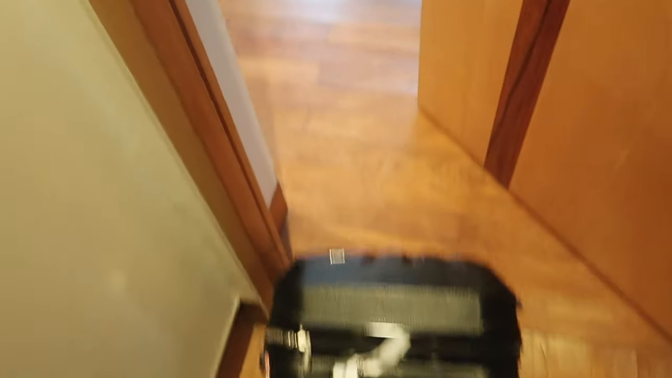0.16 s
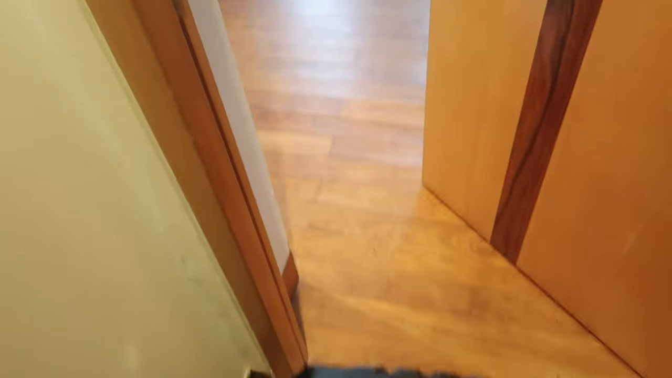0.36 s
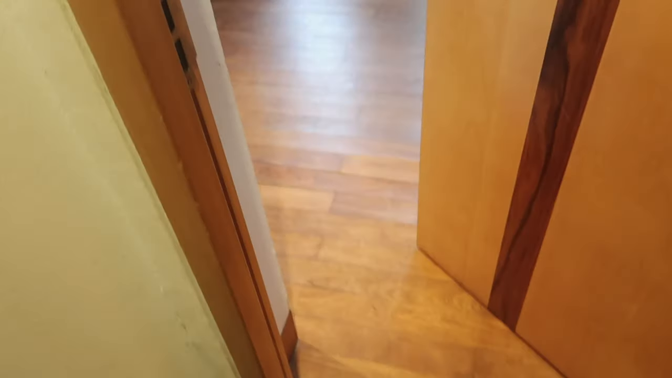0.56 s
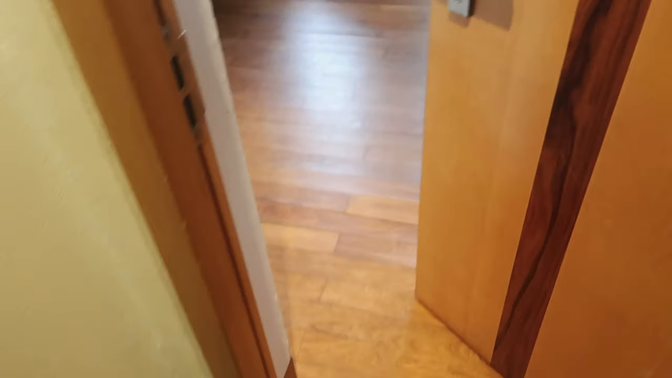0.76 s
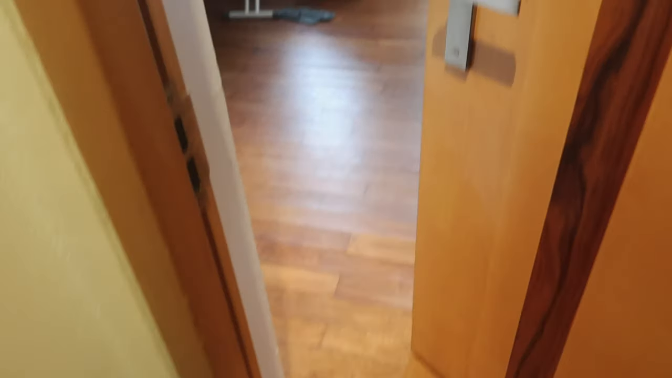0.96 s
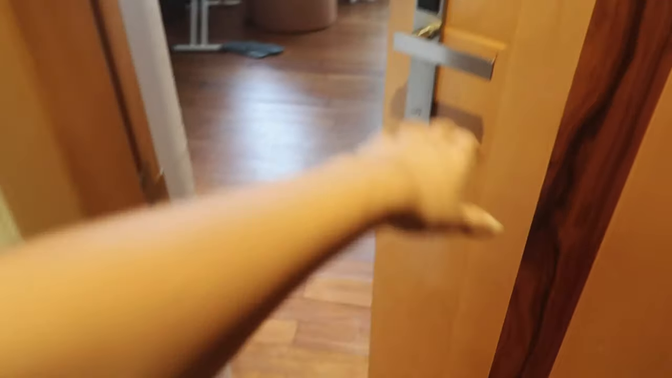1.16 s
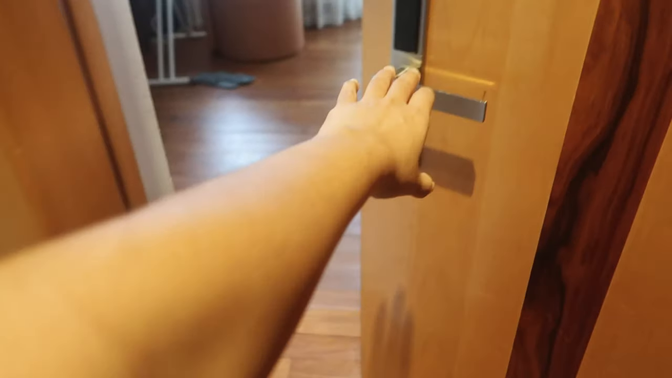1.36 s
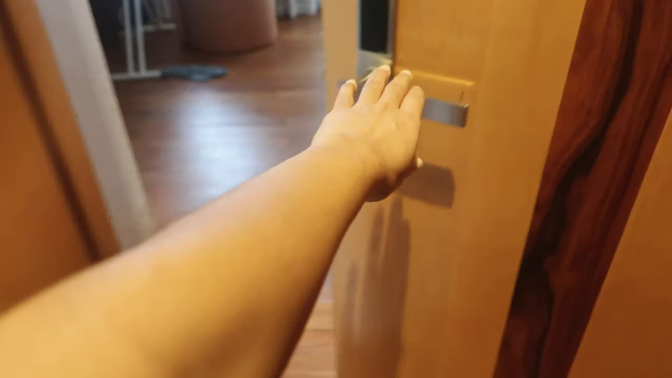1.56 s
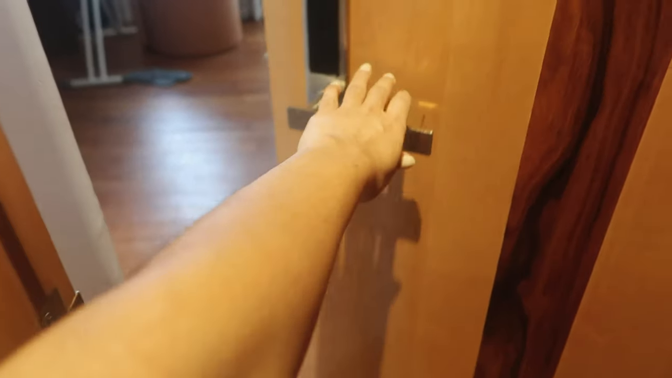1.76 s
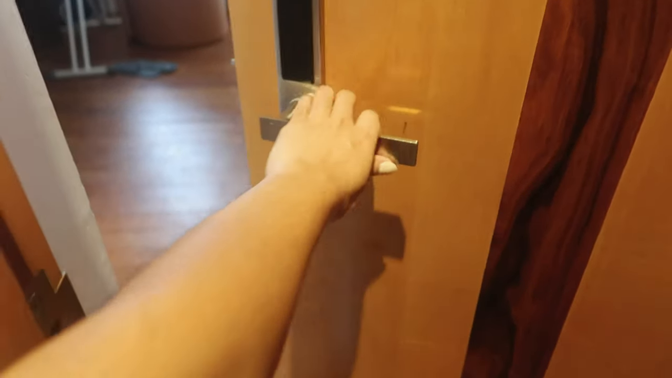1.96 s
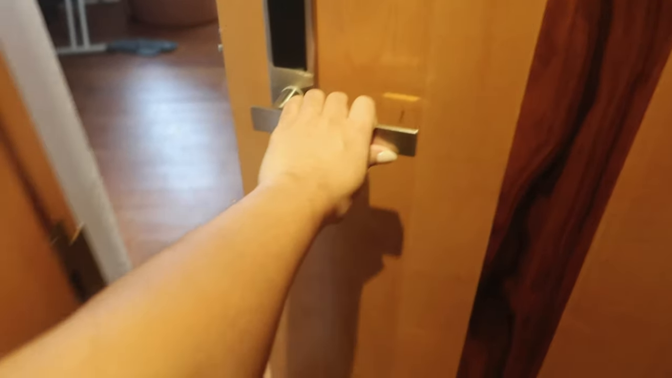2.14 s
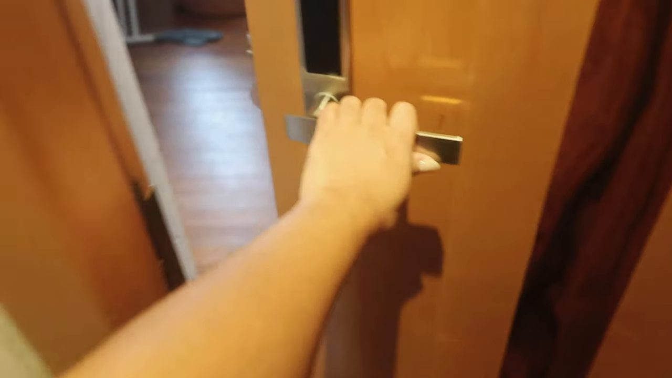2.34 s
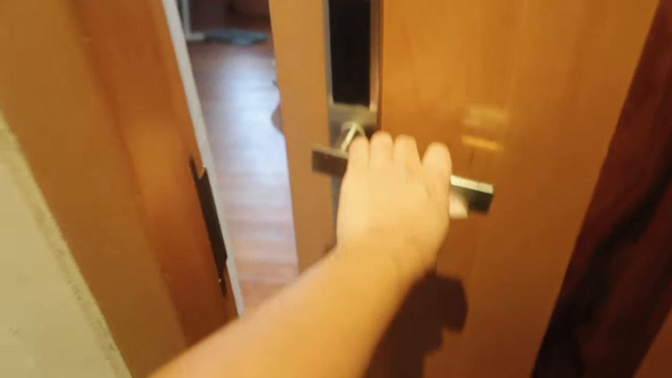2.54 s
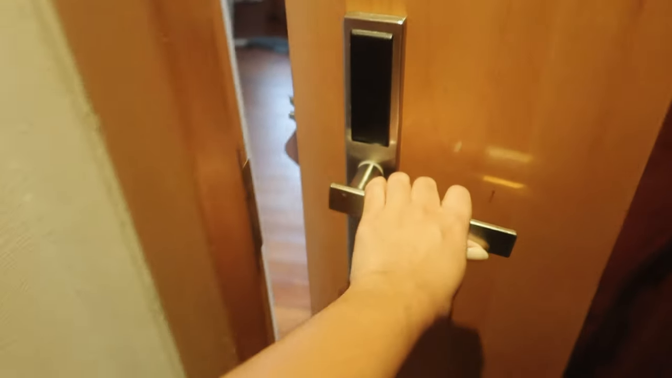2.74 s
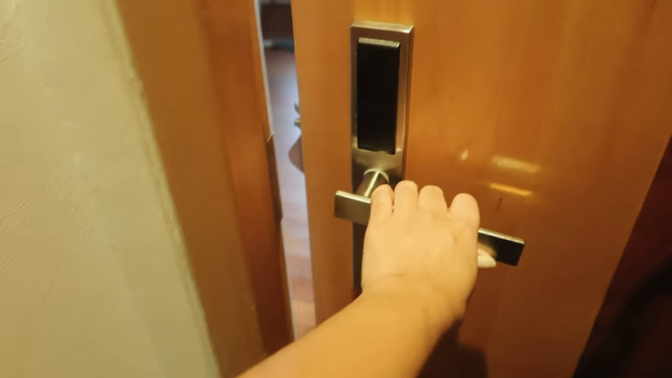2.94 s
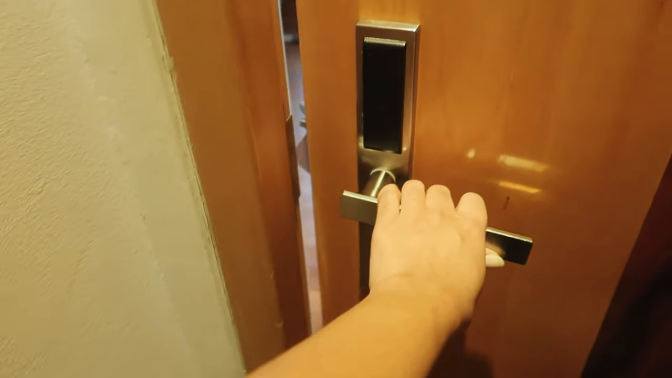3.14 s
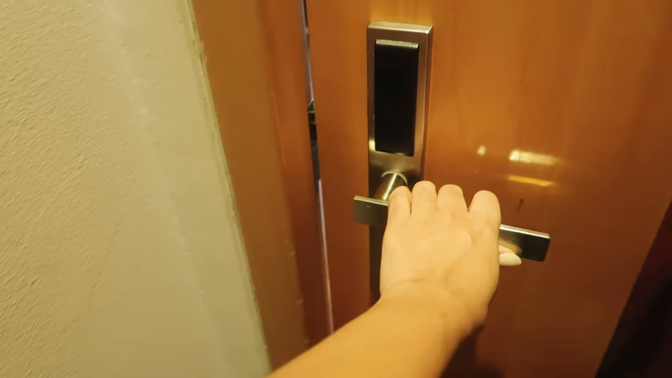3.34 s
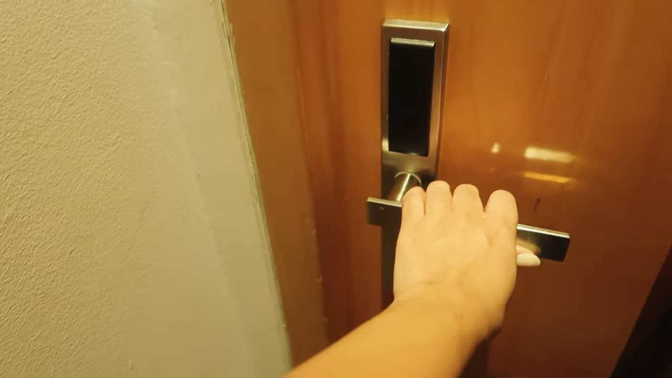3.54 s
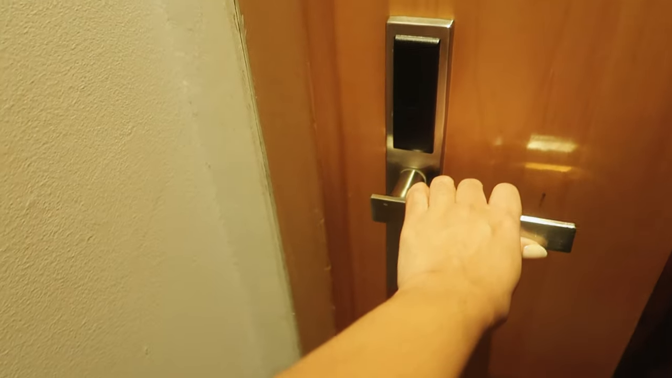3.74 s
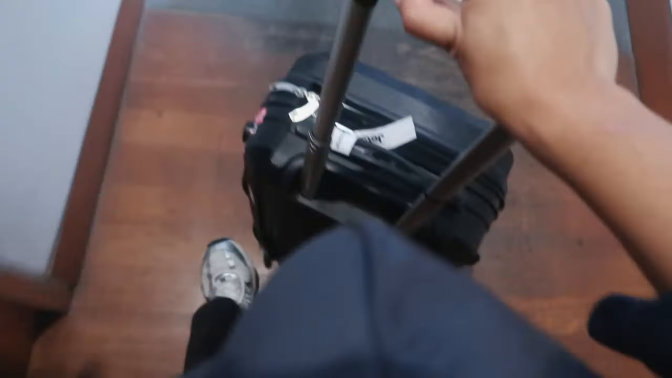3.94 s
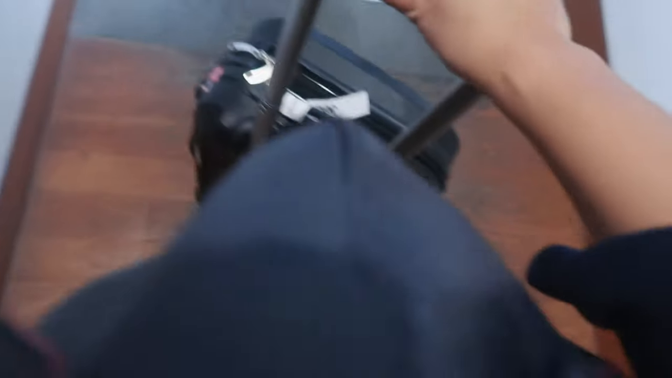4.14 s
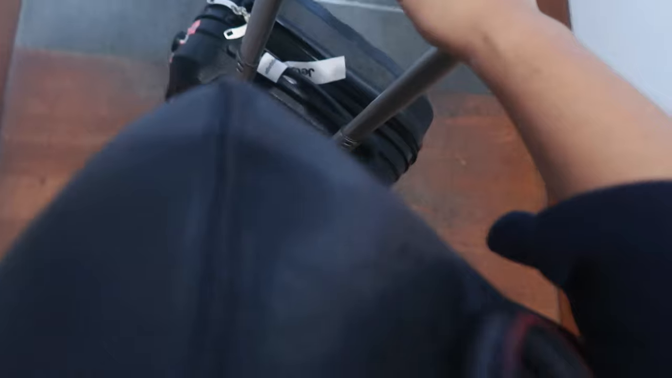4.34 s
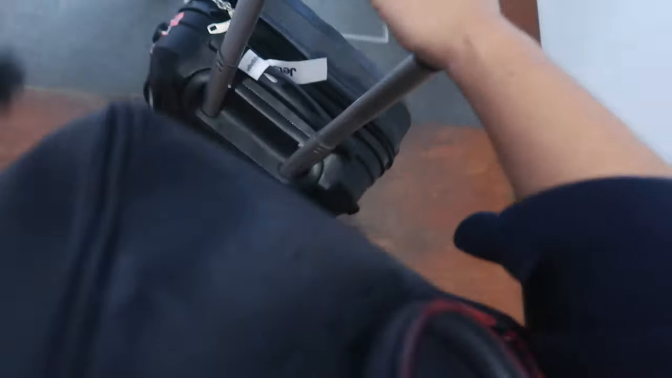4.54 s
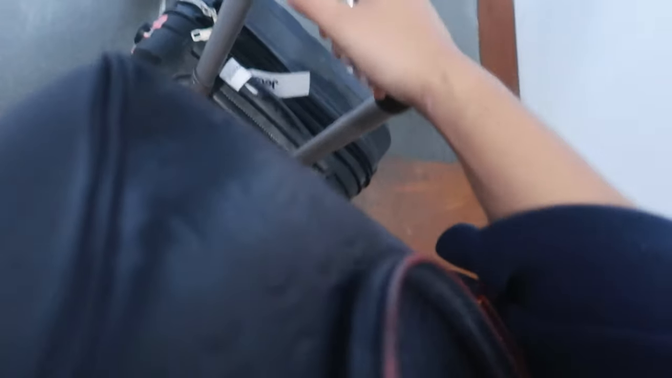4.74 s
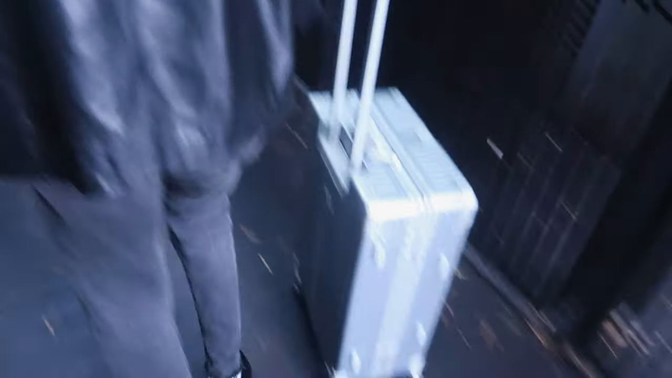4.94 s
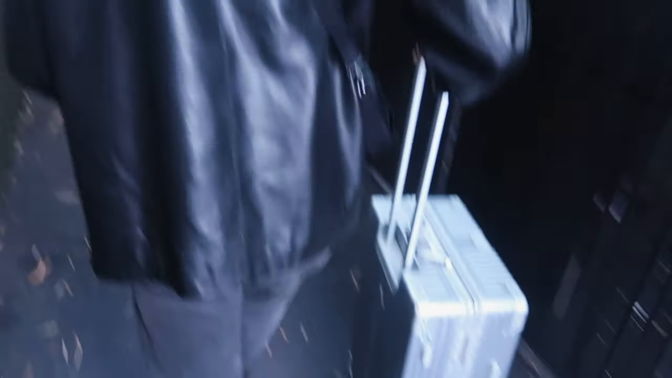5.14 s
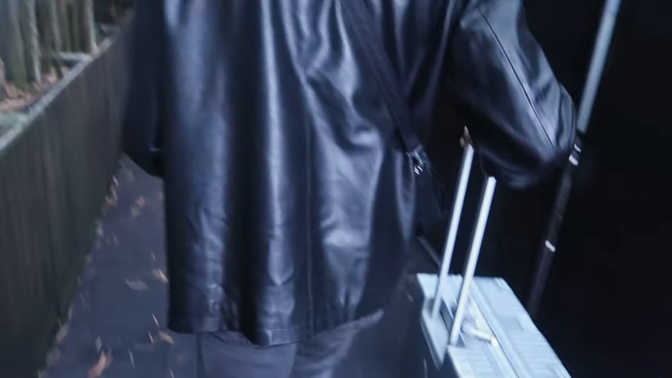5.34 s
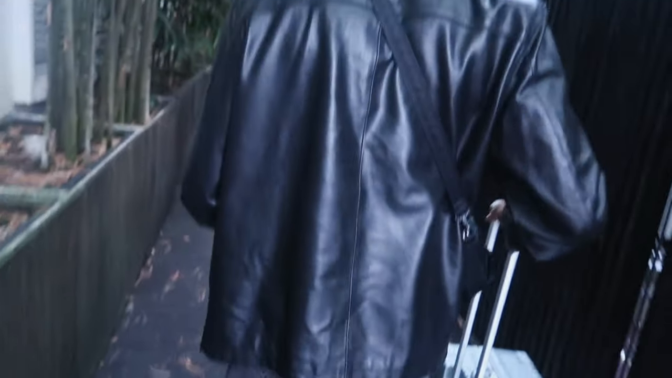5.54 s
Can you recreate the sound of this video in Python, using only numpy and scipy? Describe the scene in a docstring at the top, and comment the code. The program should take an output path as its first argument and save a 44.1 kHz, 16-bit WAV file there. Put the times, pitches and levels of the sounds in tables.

```python
"""A hard suitcase rolls over a wooden floor and a threshold: random wheel collisions drive a ringing shell.
A sleeve swishes, a lever clicks, and the door shuts: steel latch blows lead modal wood and loose fittings.
Dull bumps jolt the microphone; then a quiet hallway of filtered noise carries rustles and a few ticks.
Last, the suitcase rumbles outdoors along paving: dense collisions, small stones and seam knocks."""
import sys
import numpy as np
from scipy import signal
from scipy.fft import rfft, irfft, next_fast_len
from scipy.io import wavfile
from scipy.ndimage import uniform_filter1d, map_coordinates

SR = 44100
rng = np.random.default_rng(int(sys.argv[2]) if len(sys.argv) > 2 else 0)


def transcribe(u):
    """Save the signal u as a 16-bit wav file named by the first command-line argument.

    u: samples, shape (n,) or (channels, n), limited to [-1, 1]; the rate is SR.
    q: integer samples, one column per channel.
    """
    v = np.clip(np.atleast_2d(u).T, -1, 1)
    q = np.round(v * 32767).astype(np.int16)
    wavfile.write(sys.argv[1], SR, q)


N = 251050
TIME = np.arange(N) / SR
ROOM_END_S, LEAVE_S, OUTDOORS_S = 3.905, 3.96, 4.938
TOP_HZ = 15700

# Levels are relative, ahead of the later filters and echoes.
# Case rolling over boards: start_s, end_s, rumble_db
ROLLS = [(0, .27, -38), (.36, .83, -32.5), (1.25, 1.42, -40.5), (2.62, 2.7, -41), (3.01, 3.03, -30.5)]
ROLL_RISE_S, ROLL_COAST_S = 0.035, 0.1
GRIT_DB = -4.5  # specks re rumble
# Wheels juddering across the threshold: start_s, end_s, level_db
JUDDERS = [(.735, .785, -21.5), (2.555, 2.58, -30.5), (2.968, 3.005, -30.5)]
JUDDER_RISE_S, JUDDER_FALL_S = 0.0016, 0.029
CLATTER_DB = -11  # housings re judder, at its peak
# Wheel dropping over a joint or threshold rib: start_s, level_db, rattle_s, boom_db, brightness_db_per_octave
KNOCKS = [(.083, -16.5, 0.019, 4.5, -2.5), (.147, -19.5, 0.029, -5, -2.5), (0.238, -20, 0.0065, 4, -1.5),
          (.363, -23.5, 0.0034, -6, -1.5), (.374, -28.5, 0.005, -22, -2.5), (.386, -25.5, 0.0056, -6, -3.5),
          (0.415, -32, 0.0047, 14, 4.5), (.453, -24.5, .004, 8, -0.5), (0.486, -28.5, 0.0053, -13, .5),
          (.533, -24.5, 0.0059, -2, .5), (.568, -24, 0.0045, -3, -1), (.618, -30.5, 0.0031, -15, -2.5),
          (.664, -23.5, 0.0068, 3, -8), (0.729, -11.5, .004, -11, -1), (.738, -14.5, 0.0049, -14, -1),
          (.744, -14.5, 0.0047, -20, 0), (.754, -10.5, 0.0034, -3, -5), (.765, -11.5, .004, -4, -3),
          (.78, -15, 0.003, -21, -5), (.796, -21.5, 0.0042, -4, -4), (.95, -23, 0.003, -16, -1),
          (1.011, -18, .012, 3.5, -6), (1.029, -19.5, 0.0034, -7, -2), (1.178, -10.5, 0.012, -3, -3),
          (2.056, -32.5, 0.018, -7, -5), (2.545, -18, 0.021, -5.5, 0.5), (2.577, -25.5, 0.011, 1.5, -2),
          (2.726, -28.5, 0.0072, 5, 2), (2.761, -21.5, 0.0017, 0, -5.5), (2.894, -24, 0.0078, 0.5, -3.5),
          (2.964, -20, 0.018, -11, -3.5), (2.974, -17.5, 0.012, -5, -5), (2.997, -22, 0.0099, -1, -1),
          (3.146, -26, .0076, 3, -4.5)]
HOUSING_DB, HOUSING_DB_PER_DB = -13.5, 0.41  # housing re knock at -7.5 dB; extra per dB of knock
SHAKE_DELAY_S, SHAKE_DB, SHAKE_S = 0.037, -16, 0.014  # loose case shaking on after a knock
# Boards giving under the load: start_s, level_db
FLOOR_THUDS = [(0.241, -28), (.752, -20), (2.761, -33)]
# Plastic casters swivelling and clacking: start_s, level_db, rattle_s
CLACKS = [(0.87, -32, 0.019), (.951, -32, 0.026), (.967, -30.5, 0.016), (0.993, -35, 0.03)]
# Wheel or axle ringing on one note: start_s, pitch_hz, level_db
CHIRPS = [(.787, 2440, -29), (.827, 1790, -28.5), (.853, 1200, -32.5), (.881, 3186, -34.5),
          (.951, 675, -25.5), (.992, 3315, -35), (1.029, 653, -33), (2.761, 445, -25.5), (2.894, 485, -21)]
CHIRP_WIDTH_HZ = 56
# Shell of the case with the boards, broad spectrum: freq_hz, density_db
CASE_SPECTRUM = [(30, -28.5), (90, -25.5), (160, 1), (230, -1), (288, 2.5), (330, 2.5), (470, -2.5),
                 (590, -14.5), (668, -2.5), (1000, -15), (1490, -24), (2400, -34), (3300, -32),
                 (10000, -51), (14000, -81)]
# Ringing shell: freq_hz, width_hz, level_db
CASE_MODES = [(178.3, 11, -2.5), (228.5, 5.9, -8), (279.4, 3, -5), (376, 8.9, -11), (480, 11, -12.5),
              (637.3, 21, -10.5), (761, 19, -23.5), (1850, 40, -32.5), (2320, 43, -27), (2580, 37, -39.5)]
# Wheel housings and swivels: freq_hz, width_hz, level_db
WHEEL_MODES = [(625, 70, 1), (770, 78, 4.5), (1020, 90, 0.5), (1200, 100, 2.5), (1380, 220, -3.5),
               (1784, 280, -7.5), (2288, 89, -1), (2440, 88, -4.5), (2760, 130, -4), (3050, 140, -16)]
HOUSING_SHIFT = 0.037  # random pitch spread per blow, share
# Floorboards: freq_hz, width_hz, level_db
FLOOR_MODES = [(113, 26, 0)]
# Caster clack: freq_hz, density_db
CASTER_SPECTRUM = [(300, -13), (1000, -12), (1500, -6.5), (2600, -4.5), (5400, -7.5), (6400, -4),
                   (10500, -16.5), (12500, -30)]
# Casters: freq_hz, width_hz, level_db
CASTER_MODES = [(2500, 110, 10), (2720, 100, 4), (3000, 77, 6), (3365, 140, 3), (6040, 180, -5),
                (6700, 101, -11), (7400, 140, -3), (10500, 370, 1)]
# Overall tone of the suitcase sounds, deep bass and top rolled off: freq_hz, gain_db
SUITCASE_TONE = [(30, -11.5), (75, 0), (9500, -1.5), (11500, -3), (13000, -11.5)]

# Room decay: freq_hz, t60_s
ROOM_T60 = [(100, 0.65), (260, 0.8), (700, 0.3), (1840, 0.66), (5000, 0.31), (12000, 0.25)]
# Side channel gain over frequency: freq_hz, gain_db
SIDE_WIDTH = [(60, -30), (200, -24.5), (400, -13), (1290, -8), (2400, -3), (4400, 3.5), (8100, 7.5),
              (15000, 19)]
# Ventilation: freq_hz, density_db
ROOM_AIR = [(15, -31), (28, -10.5), (90, 6), (330, 4.5), (560, -6.5), (900, -13.5), (1600, -14.5),
            (3000, -28.5), (5300, -33), (11000, -41.5), (14500, -57)]

# Sleeve swishes: peak_s, level_db, fall_s
SWISHES = [(.42, -37.5, 1), (1.33, -47, 0.25), (1.758, -38.5, 0.12), (2.18, -32, 0.033),
           (2.49, -40.5, 0.85)]
SWISH_RISE_PER_FALL = 0.21
# Sleeve cloth: freq_hz, density_db
SLEEVE_SPECTRUM = [(150, 7), (600, 1.5), (1400, -5), (3300, -13.5), (5200, -19), (9000, -29.5),
                   (13000, -43.5)]

# Play in the door lever: start_s, level_db
LEVER_CLICKS = [(1.538, -32), (1.905, -28), (2.728, -35.5)]
# Door lever: freq_hz, width_hz, level_db
LEVER_MODES = [(383, 184, 3.5), (905, 74, 7.5), (1110, 160, -23), (1620, 370, -4), (2650, 770, -16.5),
               (5460, 130, -10.5)]
# Door meeting its frame, steel first:
# start_s, wood_db, steel_db, wood_brightness_db_per_octave, blow_s (base rattle), wood_lag_s, boom_db
SHUTS = [(3.403, -13.5, -9.5, 0.1, 0.0058, 0.0029, 0), (3.459, -23.5, -30, 0, 0.015, 0.0024, 4.5),
         (3.507, -14.5, -23, -1, 0.0089, 0.0052, 0), (3.595, -27.5, -36.5, 0.5, .008, 0.0029, -1),
         (3.623, -18, -55, -2.5, 0.011, 0.0015, 1.5), (3.641, -23.5, -51.5, -1.5, 0.014, 0.0015, 6.5),
         (3.6954, -5, -17, -1, .0035, 0.00047, -1), (3.719, -16, -29.5, -5, .006, 0.0011, 4.5),
         (3.73, -20, -34.5, -4.5, .004, 0.00088, 8.5), (3.751, -24.5, -28, -2.5, 0.0071, 0.0018, 7.5),
         (3.812, -12.5, -33, -2, 0.0033, .004, -1), (3.868, -21, -65, -4, 0.016, .003, 14.5)]
# First touch, strike and rebound of every blow: delay_s, level_db, rattle_factor
STRIKE = [(-.007, -24, .6), (0, -1, 1.1), (.022, -21.5, 2.5)]
# Leaf and frame: freq_hz, width_hz, level_db
DOOR_MODES = [(48, 23, -15.5), (102, 45, -9.5), (165, 4.7, 5.5), (218, 12, 2), (285, 6.7, 0),
              (365, 17, 9.5), (451, 11, 1), (663, 11, -0.5), (720, 80, -3), (765, 24, -1.5), (931, 27, 0),
              (1120, 70, -2.5), (1445, 57, -11), (1540, 89, -8.5), (1644, 44, -11.5), (1863, 50, -17),
              (2150, 150, -14.5), (2414, 170, -15), (2720, 150, -13.5), (3070, 260, -19), (4155, 400, -25),
              (5470, 310, -35.5)]
LATCH_SHIFT, DOOR_SHIFT = 0.034, 0.03  # random pitch spread per blow, share
# Dead knock of the frame: freq_hz, density_db
FRAME_SPECTRUM = [(40, -10.5), (160, -2.5), (400, -4), (700, -5.5), (1100, -17.5), (2000, -20.5),
                  (4500, -41.5), (12000, -53)]
# Tone of the door's wooden part, soft at the very top: freq_hz, gain_db
WOOD_TONE = [(4500, 0.5), (8000, -1.5), (13000, -14.5)]
# Loose lock case and hinges: freq_hz, density_db
FITTINGS_SPECTRUM = [(250, -18.5), (600, 4), (950, 2.5), (1500, -5), (2700, -12), (4200, -24.5),
                     (8000, -38.5), (14000, -70)]
FITTINGS_DB, FITTINGS_S, FITTINGS_PER_S = -8, 0.012, 380  # level re wood, decay, ticks per s
# Latch bolt clicking on its own: start_s, level_db, brightness_db_per_octave
LATCH_CLICKS = [(3.452, -32.5, 0), (3.498, -27, 1), (3.711, -23.5, -2), (3.722, -27, 3.5), (3.738, -30, 2),
                (3.883, -34.5, -1.2)]
# Crack of steel on steel: freq_hz, density_db
STEEL_SPECTRUM = [(300, -18.5), (1100, 4), (2600, -1), (3800, -2), (5100, -1), (6800, -11.5), (9000, -11.5),
                  (13500, -18), (15500, -27.5)]
# Latch: freq_hz, width_hz, level_db
LATCH_MODES = [(1049, 110, 2), (1130, 45, -4.5), (1390, 50, -2.5), (1700, 43, 3.5), (2140, 60, -0.5),
               (2480, 87, -1), (2900, 100, -11), (3170, 70, -3.5), (4650, 120, -14), (4800, 78, -2.5),
               (5750, 120, -4), (7100, 80, -8)]

# Dull bumps close to the microphone: start_s, level_db, brightness_db_per_octave, push_db
BUMPS = [(1.876, -29, -29, -30), (3.9504, 1, 1, -3), (5.1303, -4, -0.5, -38)]
# A brush and two quick jolts in every bump: delay_s, level_db, rattle_s
JOLTS = [(-.005, -10, 0.0074), (0, -6.5, 0.01), (.0065, -2.5, .002)]
# Jolt: freq_hz, density_db
THUD_SPECTRUM = [(20, -27.5), (60, -5.5), (135, -0.5), (280, 1.5), (480, -4.5), (680, -22.5), (1200, -41.5),
                 (2600, -39), (5000, -54), (13000, -77.5)]
# Deep push: freq_hz, density_db
PUSH_SPECTRUM = [(12, -11.5), (35, -3.5), (120, 2), (200, -9.5), (600, -50.5), (3000, -86)]
PUSH_DELAY_S = 0.0017
# Crack ending the hardest bump: start_s, level_db
BUMP_CRACK = (3.9578, -15)
# Crack: freq_hz, density_db
CRACK_SPECTRUM = [(400, -24), (1000, 3), (2000, 7), (3200, -5.5), (5000, -24.5), (12000, -43)]
# Side channel of the bumps: freq_hz, gain_db
BUMP_WIDTH = [(120, -40), (300, -12), (600, 4.5), (3000, 3.5)]

# Still hallway air: freq_hz, density_db
HALL_AIR = [(24, -43), (40, -50), (112, 0), (297, 2), (395, 0.5), (446, 4.5), (701, -11.5), (1240, -13.5),
            (1370, -20), (12000, -56), (15600, -92), (22000, -120)]
# Rumble of handling: freq_hz, density_db
HANDLING_SPECTRUM = [(15, -11), (35, -17.5), (100, -1), (200, -5), (1000, -84)]
HALL_AIR_DB, HALL_HISS_DB = -56, -71
STIR_DB, HANDLING_DB = -52, -43  # rustle and rumble of handling at the start of the hallway
SETTLE_DB_PER_S, STILL_S = 18, 4.36  # handling eases off, then stops
# Ticks of the pull handle: start_s, level_db
TICKS = [(4.063, -24.5), (4.076, -24.5), (4.586, -40.5)]
# Pull handle: freq_hz, density_db
HANDLE_SPECTRUM = [(50, -17), (250, 4.5), (900, -4), (1500, -10.5), (2300, -14), (5000, -13), (8000, -68)]
# Scattered sound of hallway and path: freq_hz, side_gain_db
WALL_SCATTER = [(100, -60), (300, -26.5), (700, -6), (1800, -6), (5000, -12)]
# Clothes rustling in the hallway: start_s, end_s, level_db
RUSTLES = [(4.15, 4.18, -79), (4.225, 4.235, -76.5), (4.295, 4.315, -69.5), (4.35, 4.36, -75),
           (4.82, 4.92, -70)]
RUSTLE_RISE_S, RUSTLE_FALL_S = 0.011, 0.0094
# Faint hiss: freq_hz, density_db
HISS_SPECTRUM = [(500, -2), (1500, 5), (3500, -4), (6000, -11.5), (9000, -18), (14000, -25.5)]

# Case rolling over paving: start_s, end_s, rumble_db
PATH_ROLLS = [(4.99, 5.125, -25.5), (5.35, 5.69, -32.5)]
PATH_RISE_S, PATH_COAST_S = 0.11, 0.064
GRIT_HISS_DB = -29  # hiss re paving rumble
# Wheels crossing seams in the paving: start_s, level_db, brightness_db_per_octave
SEAMS = [(4.99, -19.5, 1.5), (5.004, -19, 1.5), (5.118, -15, 0.5), (5.131, -18.5, 4.5), (5.146, -18, 1.5),
         (5.423, -21.5, -3), (5.653, -28.5, 1)]
# Rough paving: freq_hz, density_db
PAVING_SPECTRUM = [(30, -35.5), (86, -26.5), (125, -4.5), (155, -1.5), (240, -10), (400, -9), (600, -22),
                   (750, -26.5), (1000, -34.5), (1250, -36), (1600, -46.5), (2500, -47.5), (5000, -51),
                   (12000, -86.5)]


def amp(db):
    """Decibels to gain."""
    return 10 ** (np.asarray(db) / 20)


def unit(x):
    """Scale to rms 1."""
    return x / np.sqrt(np.mean(x ** 2) + 1e-20)


def along(points, hz):
    """Interpolate (Hz, value) points on a log axis."""
    f, v = np.transpose(points)
    return np.interp(np.log(hz + 1), np.log(f + 1), v)


def between(start_s, end_s, fade):
    """1 inside a time span, straight fades of fade seconds outside it."""
    return np.clip(1 + np.minimum(TIME - start_s, end_s - TIME) / fade, 0, 1)


def swells(rows, rise_s, fall_s):
    """Gain of (start_s, end_s, level_db) strokes: exponential rise, hold, exponential fall."""
    total = 0
    for start_s, end_s, db in rows:
        outside = np.maximum((start_s - TIME) / rise_s, (TIME - end_s) / fall_s)
        total = total + amp(db) * np.exp(-np.maximum(outside, 0))
    return total


def wobble(rate):
    """Smooth random curve, rate knots per second."""
    knots = rng.standard_normal(int(N * rate / SR) + 4)
    return map_coordinates(knots, [TIME * rate])


def filtered(x, response):
    """Apply a complex response of frequency."""
    n = x.shape[-1]
    size = 2 * next_fast_len(n // 2 + 4096)
    return irfft(rfft(x, size) * response(np.fft.rfftfreq(size, 1 / SR)), size)[..., :n]


def coloured(x, points):
    """Minimum-phase filter with the given (Hz, dB) magnitude, by folding the cepstrum."""
    def response(hz):
        cepstrum = irfft(np.log(amp(along(points, hz))))
        half = len(cepstrum) // 2
        fold = np.r_[1, np.full(half - 1, 2), 1, np.zeros(half - 1)]
        return np.exp(rfft(cepstrum * fold))
    return filtered(x, response)


def resonate(x, modes):
    """Ring parallel damped modes, with alternating signs."""
    def response(f):
        total = 0
        for k, (hz, width, db) in enumerate(modes):
            damping = 1j * f * width
            total = total + (-1) ** k * amp(db) * damping / (hz * hz - f * f + damping)
        return total
    return filtered(x, response)


def shifted(modes, shift, spread_db):
    """Draw mode pitches and levels slightly at random."""
    draws = rng.standard_normal((len(modes), 2))
    return [(hz * np.exp(shift * a), width, db + spread_db * b)
            for (hz, width, db), (a, b) in zip(modes, draws)]


def noise(spectrum):
    """Coloured noise of rms 1."""
    return unit(coloured(rng.standard_normal(N), spectrum))


def contact(rattle_s, chatter, brightness=0, rise_s=0.0058, grit_db=0.0):
    """Force of one blow: an impulse, then clumped chatter that builds and dies; brightness in dB/octave."""
    t = np.arange(SR // 4) / SR
    clumps = amp(grit_db * np.interp(t * 250, np.arange(64), rng.standard_normal(64)))
    envelope = np.exp(-t / max(rattle_s, 1 / SR)) * (1 - np.exp(-t / rise_s))
    after = clumps * rng.standard_normal(len(t)) * envelope
    force = (t == 0) + chatter * after / np.linalg.norm(after)
    return coloured(force, [(150, 0), (4800, 5 * brightness)])  # five octaves


def clatter(rate, decay_s, spread_db):
    """Force of loose parts after a blow: separate ticks of uneven size that die away."""
    t = np.arange(SR // 4) / SR
    ticks = (rng.random(len(t)) < rate / SR) | (t == 0)
    sizes = rng.choice([-1, 1], len(t)) * amp(spread_db * rng.standard_normal(len(t)))
    return ticks * sizes * np.exp(-t / decay_s)


def add(track, s, db, sound):
    """Mix a sound in at time s, its loudest 6 ms at the given level."""
    loudest = np.sqrt(uniform_filter1d(sound ** 2, size=256).max())
    part = track[round(s * SR):][:len(sound)]
    part += amp(db) / loudest * sound[:len(part)]


def boom(x, db):
    """Raise or lower the lowest modes, as the place of the blow does."""
    return coloured(x, [(185, db), (260, 0)])


def tread(rate, spread_db, sway_db):
    """Force under rolling wheels: many tiny collisions of uneven size, swaying with the load."""
    signs = (rng.random(N) < rate / SR) * rng.choice([-1, 1], N)
    hits = signs * amp(spread_db * rng.standard_normal(N))
    return hits * amp(sway_db * wobble(28))


def grit(rate, low_hz, high_hz, cycles, spread_db):
    """Specks crushed under a wheel: short woody ticks, each with its own pitch and size."""
    draws = rng.random((int(rate * N / SR), 3))
    start = (draws[:, :1] * N).astype(int)
    hz = low_hz * (high_hz / low_hz) ** draws[:, 1:2]
    size = amp(spread_db * draws[:, 2:]) * low_hz / hz
    k = np.arange(1024)
    ticks = size * np.sin(2 * np.pi * hz * k / SR) * np.exp(-hz * k / SR / cycles)
    return unit(np.bincount((start + k).ravel(), ticks.ravel(), N)[:N])


def shell(force):
    """Case and boards: a broad thud and a few modes that ring on."""
    return coloured(force, CASE_SPECTRUM) + amp(5.0) * resonate(force, CASE_MODES)


def rolling():
    """Fine collisions drive the shell over specks of grit; coarse rib collisions judder on the threshold."""
    # grain of the boards slightly favours the middle modes
    grain = tread(rate=540, spread_db=1.5, sway_db=5)
    grain = coloured(grain, [(150, -0.78), (300, -0.93), (650, 0.9), (2500, -0.97)])
    specks = grit(rate=130, low_hz=380, high_hz=1500, cycles=4.5, spread_db=16)
    rumble = swells(ROLLS, ROLL_RISE_S, ROLL_COAST_S) * (unit(shell(grain)) + amp(GRIT_DB) * specks)
    ribs = tread(rate=400, spread_db=2.5, sway_db=0.2)
    ribs = coloured(ribs, [(150, -6.5), (700, 5), (2500, 9.5), (9000, 8.5)])
    judder = swells(JUDDERS, JUDDER_RISE_S, JUDDER_FALL_S)
    # housings clatter more the harder the judder
    housings = amp(CLATTER_DB) * judder / judder.max() * unit(resonate(ribs, WHEEL_MODES))
    return rumble + judder * (unit(shell(ribs)) + housings)


def add_knock(out, s, db, rattle_s, boom_db, tilt):
    """One wheel drop: the shell thuds, the housing rings, the loose case shakes on."""
    force = contact(rattle_s, chatter=1.8, brightness=tilt, rise_s=0.00098, grit_db=2.5)
    add(out, s, db, boom(shell(force), boom_db))
    housing = shifted(WHEEL_MODES, HOUSING_SHIFT, spread_db=3)
    housing_db = db + HOUSING_DB + HOUSING_DB_PER_DB * (db + 7.5)
    force = contact(rattle_s, chatter=1.2, brightness=tilt, rise_s=0.0013)
    add(out, s, housing_db, resonate(force, housing))
    shake = clatter(rate=320, decay_s=SHAKE_S, spread_db=7.5)
    shaken = unit(shell(shake)) + amp(-10) * unit(resonate(shake, housing))
    add(out, s + SHAKE_DELAY_S, db + SHAKE_DB, shaken)


def suitcase():
    """Rolling wheels shake shell and boards; knocks, floor thuds, clacks and chirps ring on top."""
    out = rolling()
    for knock in KNOCKS:
        add_knock(out, *knock)
    for s, db in FLOOR_THUDS:
        add(out, s, db, resonate(contact(rattle_s=0.0035, chatter=0.3, brightness=-13), FLOOR_MODES))
    for s, db, rattle_s in CLACKS:
        force = contact(rattle_s, chatter=6.8, rise_s=0.0014, grit_db=3.0)
        ring = resonate(force, shifted(CASTER_MODES, HOUSING_SHIFT, spread_db=1))
        add(out, s, db, unit(coloured(force, CASTER_SPECTRUM)) + amp(-8) * unit(ring))
    for s, hz, db in CHIRPS:
        force = contact(rattle_s=0.0046, chatter=1.0, brightness=-8)
        add(out, s, db, resonate(force, [(hz, CHIRP_WIDTH_HZ, 0)]))
    return coloured(out, SUITCASE_TONE)


def reflections(t60):
    """Dense echoes of energy 1; each frequency dies at its own speed."""
    hz, t, z = signal.stft(rng.standard_normal(SR * 3 // 4), SR, nperseg=256)
    decay = amp(-60 * t / along(t60, hz)[:, None])
    tail = signal.istft(z * decay, SR, nperseg=256)[1]
    return tail / np.linalg.norm(tail)


def room_echo(x, step_s):
    """The room's echoes: a freshly drawn random tail for each crossfaded step."""
    step = round(step_s * SR)
    out = np.zeros(N + 2 * SR)
    for start in range(0, round(LEAVE_S * SR), step):
        part = x[start:start + 2 * step] * np.bartlett(2 * step)
        if part.any():
            tail = signal.fftconvolve(part, reflections(ROOM_T60))
            out[start + SR // 200:][:len(tail)] += tail  # 5 ms pre-delay
    return out[:N]


def in_room(x, wet_db, near_db, near_t60, width_db):
    """The room rings on; short dense echoes make the stereo image wider towards the treble."""
    def echo(t60):
        delayed = np.pad(x, (SR // 200, 0))  # 5 ms
        return signal.fftconvolve(delayed, reflections(t60))[:N]
    mid = x + amp(wet_db) * room_echo(x, step_s=0.09)
    near = amp(near_db) * echo([(1000, near_t60)])
    far = amp(wet_db - 5.0) * echo(ROOM_T60)
    side = amp(width_db) * coloured(near + far, SIDE_WIDTH)
    return np.array([mid + side, mid - side])


def room_air():
    """Steady ventilation: coloured noise, nearly mono in the bass."""
    mid, side = noise(ROOM_AIR), coloured(noise(ROOM_AIR), SIDE_WIDTH)
    return amp(-42.5 + 1.1 * wobble(15)) * np.array([mid + side, mid - side])


def sleeve():
    """Cloth swishes as the arm moves: flickering noise; slow strokes also start slowly."""
    strokes = 0
    for s, db, fall_s in SWISHES:
        strokes = strokes + swells([(s, s, db)], SWISH_RISE_PER_FALL * fall_s, fall_s)
    return strokes * amp(0.53 * wobble(57)) * noise(SLEEVE_SPECTRUM)


def latch(rattle_s, brightness=0):
    """Steel on steel: a bright crack and a short ring, its modes drawn slightly at random."""
    force = contact(rattle_s, chatter=1.6, brightness=brightness, rise_s=0.00035, grit_db=-3)
    crack = coloured(force, STEEL_SPECTRUM)
    modes = shifted(LATCH_MODES, LATCH_SHIFT, spread_db=-1.5)
    ring = resonate(contact(rattle_s, chatter=0.98, brightness=brightness), modes)
    return unit(crack) + amp(-2) * unit(ring)


def add_shut(out, s, wood_db, steel_db, tilt, blow_s, lag_s, boom_db):
    """One door blow: latch steel, then the ringing leaf, the dead broad frame and the loose fittings."""
    for delay_s, db, stretch in STRIKE:
        rattle_s = blow_s * stretch
        # each blow draws its mode pitches and levels slightly at random
        modes = shifted(DOOR_MODES, DOOR_SHIFT, spread_db=-0.5)
        leaf = resonate(contact(rattle_s, chatter=1.3, brightness=tilt, rise_s=0.0016), modes)
        force = contact(3 * rattle_s, chatter=3.5, brightness=tilt, rise_s=0.00061, grit_db=7)
        frame = coloured(force, FRAME_SPECTRUM)
        for wood in (leaf, frame):
            add(out, s + lag_s + delay_s, wood_db + db - 1.5, coloured(boom(wood, boom_db), WOOD_TONE))
        add(out, s + delay_s, steel_db + db, latch(0.5 * rattle_s))
    # a blow that goes into the boom shakes the fittings less
    fittings = coloured(clatter(FITTINGS_PER_S, FITTINGS_S, spread_db=3.5), FITTINGS_SPECTRUM)
    add(out, s + lag_s, wood_db + FITTINGS_DB - 0.29 * boom_db, fittings)


def door():
    """The lever clicks in its play; then latch, leaf, frame and fittings are struck, with lone bolt clicks."""
    out = np.zeros(N)
    for s, db in LEVER_CLICKS:
        add(out, s, db, resonate(contact(rattle_s=0.012, chatter=2.2, rise_s=0.0033), LEVER_MODES))
    for shut in SHUTS:
        add_shut(out, *shut)
    for s, db, brightness in LATCH_CLICKS:
        add(out, s, db, latch(rattle_s=0.003, brightness=brightness))
    return out


def bumps():
    """Short, dull jolts on a deep push, with no ring; each port is shaken a little differently."""
    mid, side = np.zeros(N), np.zeros(N)
    for s, level_db, brightness, push_db in BUMPS:
        for delay_s, db, rattle_s in JOLTS:
            for track in (mid, side):
                force = contact(rattle_s, chatter=0.91, brightness=brightness)
                add(track, s + delay_s, level_db + db, coloured(force, THUD_SPECTRUM))
        push = coloured(contact(rattle_s=0.0029, chatter=0.54), PUSH_SPECTRUM)
        add(mid, s + PUSH_DELAY_S, push_db, push)
    crack = coloured(contact(rattle_s=0.0015, chatter=1.4, rise_s=0.00044), CRACK_SPECTRUM)
    add(mid, *BUMP_CRACK, crack)
    side = coloured(side, BUMP_WIDTH)
    return np.array([mid + side, mid - side]) * amp([[-0.8], [0.8]])


def hallway():
    """Still air, handling noise that settles and ticks from the pull handle."""
    settling = amp(-SETTLE_DB_PER_S * np.maximum(TIME - LEAVE_S, 0))
    handling = settling * between(LEAVE_S, STILL_S, fade=0.05)
    out = (amp(HALL_AIR_DB) + amp(STIR_DB) * handling) * noise(HALL_AIR)
    out += amp(HANDLING_DB) * handling * noise(HANDLING_SPECTRUM)
    for s, db in TICKS:
        force = contact(rattle_s=0.0019, chatter=0.78, brightness=-2.0)
        add(out, s, db, coloured(force, HANDLE_SPECTRUM))
    return out * between(LEAVE_S, OUTDOORS_S, fade=0.0071)


def distant_hiss():
    """Faint hiss, unrelated between ports: hallway with rustling clothes, then following the wheels outdoors."""
    indoors = amp(HALL_HISS_DB) * between(LEAVE_S, OUTDOORS_S, fade=0.015)
    rustles = swells(RUSTLES, RUSTLE_RISE_S, RUSTLE_FALL_S) * amp(2.45 * wobble(70))
    wheels = swells(PATH_ROLLS, PATH_RISE_S, PATH_COAST_S) * between(OUTDOORS_S, N / SR, fade=0.003)
    level = (indoors + rustles + amp(GRIT_HISS_DB) * wheels) * amp(0.84 * wobble(9.6))
    return level * np.array([noise(HISS_SPECTRUM), noise(HISS_SPECTRUM)])


def from_left(x, lead_s):
    """The sound reaches the left port first: opposite half-lead phase shifts."""
    return filtered(x, lambda hz: np.exp(1j * np.pi * hz * lead_s * np.array([[1], [-1]])))


def path():
    """Wheels drone on rough paving (dense collisions) and trip over seams and small stones."""
    rumble = unit(coloured(tread(rate=7900, spread_db=2, sway_db=2.0), PAVING_SPECTRUM))
    stones = grit(rate=110, low_hz=380, high_hz=1300, cycles=3, spread_db=18)
    out = swells(PATH_ROLLS, PATH_RISE_S, PATH_COAST_S) * (rumble + amp(-16.5) * stones)
    for s, db, brightness in SEAMS:
        force = contact(rattle_s=0.0074, chatter=3.6, brightness=brightness, rise_s=0.0017)
        add(out, s, db, coloured(force, PAVING_SPECTRUM))
    return out * between(OUTDOORS_S, N / SR, fade=0.0019)


def scene():
    """The room, with the door straight ahead; then the hallway, then the path along a wall."""
    moving = suitcase() + sleeve()
    room = in_room(moving, wet_db=-7.5, near_db=-2.5, near_t60=0.06, width_db=-4.4) + room_air()
    room += in_room(door(), wet_db=-10.0, near_db=-7.5, near_t60=0.05, width_db=-4.0)
    room = room * between(0, ROOM_END_S, fade=0.07)
    ahead = hallway() + path()
    scatter = signal.fftconvolve(ahead, reflections([(1000, 0.094)]))[:N]
    scatter = coloured(scatter, WALL_SCATTER)
    later = from_left(ahead, lead_s=0.00012) + np.array([scatter, -scatter]) + distant_hiss()
    return room + bumps() + later


def record(dry):
    """The hardest blows overload the input smoothly; the treble ends steeply at the band limit."""
    clipped = dry / (1 + dry ** 8) ** (1 / 8)
    return filtered(clipped, lambda hz: 1 / (1 + (hz / TOP_HZ) ** 90))


dry = scene()
out = record(dry)
transcribe(out)
```